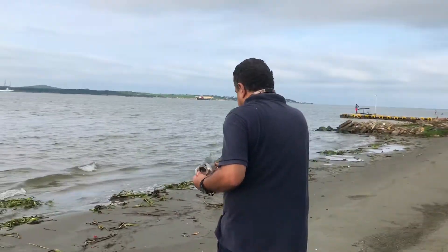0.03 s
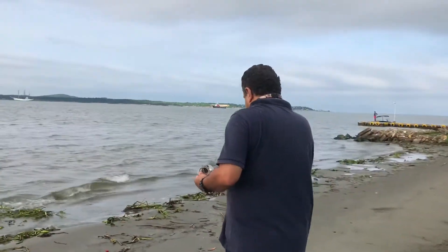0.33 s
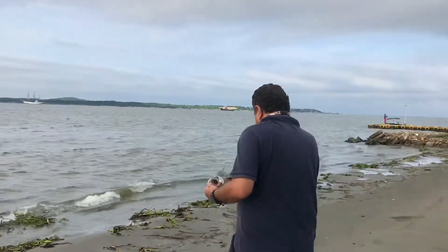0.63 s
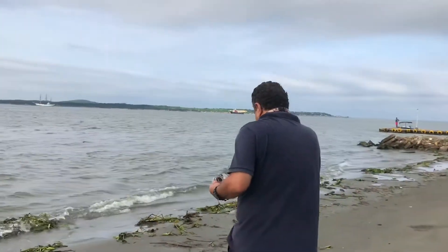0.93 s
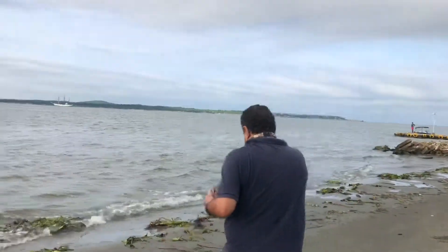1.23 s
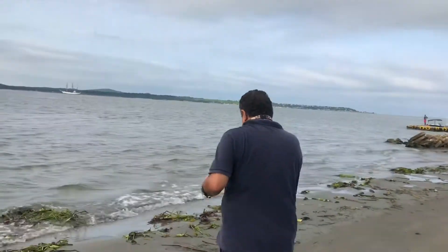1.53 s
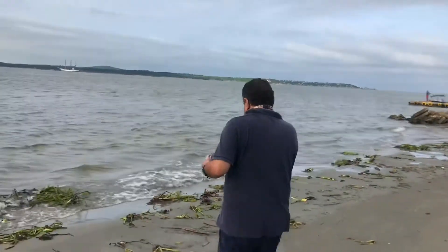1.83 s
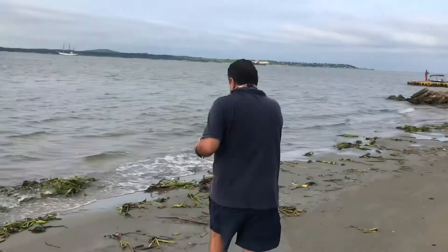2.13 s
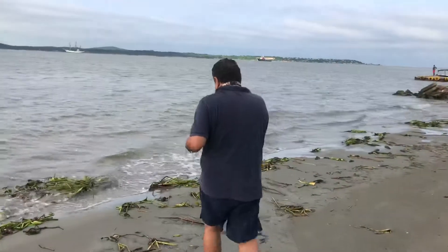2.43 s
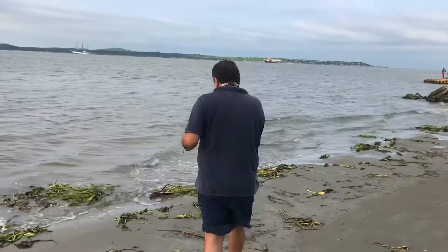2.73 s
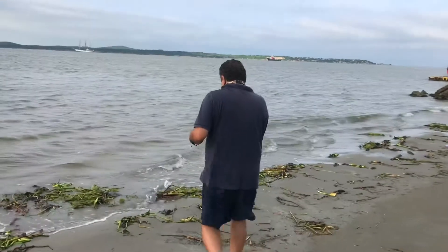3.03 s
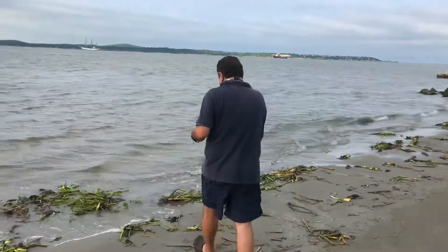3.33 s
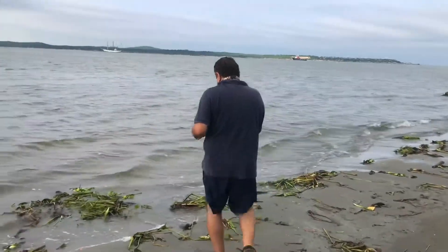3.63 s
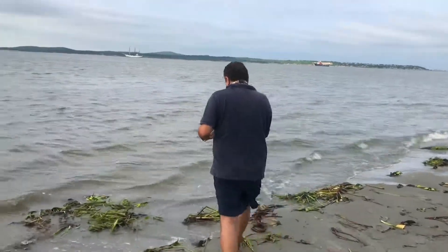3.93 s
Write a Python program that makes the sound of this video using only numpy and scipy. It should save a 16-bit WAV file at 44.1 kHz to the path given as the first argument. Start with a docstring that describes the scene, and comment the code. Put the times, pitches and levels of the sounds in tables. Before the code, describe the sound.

Footsteps crunch on wet sand near the microphone, about one every 0.6 seconds, from the start until roughly 3.7 seconds. Wind rumbles throughout, with gusts buffeting the microphone in the first half second, from about 1.4 to 1.8 seconds and again near 3 seconds. Small waves hiss and bubble behind, swelling slightly around 1 second, and a few droplets tick close by.

```python
"""At the water's edge, on wet sand: a person walks near the microphone, a step about every 0.6 s.
Each step packs the sand in a run of tiny slips: a hollow scrunch at the heel, then a brighter
crunch that stops short. Wind rumbles on the microphone and its gusts briefly overload it.
Behind the steps, small waves fizz on the shore with bursting bubbles, and droplets tick close by."""
import sys
import numpy as np
from scipy import signal
from scipy.fft import rfft, irfft
from scipy.io import wavfile
from scipy.ndimage import uniform_filter1d

SR = 44100
rng = np.random.default_rng(int(sys.argv[2]) if len(sys.argv) > 2 else 0)


def log_audio(samples):
    """Write samples as a 16-bit WAV file to the path given in sys.argv[1]."""
    # one column per channel
    frames = np.atleast_2d(samples).T
    # limit to full scale, then quantise
    limited = np.clip(frames, -1, 1)
    pcm = np.round(limited * 32767).astype(np.int16)
    wavfile.write(sys.argv[1], SR, pcm)


N = 176400
TIME = np.arange(N) / SR
FILTER_HZ = np.fft.rfftfreq(4096, 1 / SR)


def amp(db):
    return 10 ** (np.asarray(db) / 20)


def unit_rms(x):
    return x / np.sqrt(np.mean(x ** 2) + 1e-20)


def spectrum_db(points, hz=FILTER_HZ):
    """Join spectrum points with straight lines on a log-frequency axis."""
    point_hz, db = np.transpose(points)
    return np.interp(np.log(hz + 1), np.log(point_hz), db)


def add(mix, start, sound):
    part = mix[max(round(start * SR), 0):][:len(sound)]
    part += sound[:len(part)]


def colour(x, db):
    """Minimum-phase filter with the given gains at FILTER_HZ."""
    log_gain = np.log(amp(np.r_[db, db[-2:0:-1]]))
    taps = np.fft.ifft(np.exp(signal.hilbert(log_gain).conj())).real
    return signal.fftconvolve(x, taps[:len(db)])


def noise(gain):
    """Noise of rms 1 whose spectrum is gain(Hz)."""
    hz = np.fft.rfftfreq(N, 1 / SR) + 1
    return unit_rms(irfft(rfft(rng.standard_normal(N)) * gain(hz), N))


def steadied(x, share, samples):
    """Even out a share of the chance swells."""
    power = uniform_filter1d(x ** 2, size=samples) + 1e-9
    return unit_rms(x / power ** (share / 2))


def slip(samples=200, grit=0.28, decay_s=0.0012):
    """One slip of the sand: a click and a brief spill of grains."""
    burst = grit * rng.standard_normal(samples) * np.exp(-np.arange(samples) / SR / decay_s)
    burst[0] += 1
    return burst


# Wet sand under the heel and under the sole (frequency [Hz], level [dB])
HEEL_SPECTRUM = [(100, -23), (350, -14), (700, -10), (1100, -1.5), (1600, -1.5), (2300, -8.5), (3200, -17),
                 (4100, -15.5), (5000, -21), (8000, -30), (10300, -56), (16000, -54)]
SOLE_SPECTRUM = [(100, -22), (350, -5.5), (700, -7), (1200, -7), (1700, -7.5), (2300, -7), (3200, -4.5),
                 (4150, 4), (4950, -14.5), (8000, -19), (10300, -28), (16000, -43)]

def sand_colour(tone):
    """Tone 0 is the hollow heel, 1 the bright sole; above 1 is brighter still."""
    return (1 - tone) * spectrum_db(HEEL_SPECTRUM) + tone * spectrum_db(SOLE_SPECTRUM)


# Sand giving way underfoot, near the microphone (time [s], length [s], level [dB], tone [0 heel, 1 sole])
SCRUNCHES = [(0.0, 0.025, -22.5, 0.34), (0.549, 0.034, -36, 0.09), (.582, 0.072, -24.5, 0.47),
             (1.166, 0.092, -31, 0.72), (1.253, 0.029, -26, 0.63), (1.283, 0.039, -23.5, 0.9),
             (1.826, .065, -20.5, 0.59), (2.342, 0.074, -28, 0.79), (2.419, 0.065, -22.5, 0.8),
             (2.911, 0.085, -32, 0.63), (2.966, 0.0252, -23.5, 0.064), (2.989, 0.017, -26, 0.72),
             (3.006, 0.053, -27.5, 0.63), (3.53, 0.064, -30.5, 0.89)]

def scrunches(slips_per_s=250, jitter=0.38, build_db=6, attack_s=0.002, stop_s=0.0036):
    """Sand sticks and slips at an uneven rate, harder as the weight comes on, then stops short."""
    out = np.zeros(N)
    for start, length, db, tone in SCRUNCHES:
        t = TIME[TIME < length]
        slips = np.zeros(len(t))
        gaps = np.exp(jitter * rng.standard_normal(40)) / slips_per_s
        for onset in np.cumsum(gaps) - gaps[0]:
            add(slips, onset, amp(0.5 * rng.standard_normal()) * slip())
        rub = 0.62 * rng.standard_normal(SR)[:len(t)]
        weight = amp(build_db * t / length)
        gate = np.minimum(t / attack_s, 1) * np.minimum((length - t) / stop_s, 1)
        crunch = colour((unit_rms(slips) + rub) * weight * gate, sand_colour(tone))
        add(out, start, amp(db) * crunch * np.sqrt(len(t) / np.sum(crunch ** 2)))
    return out


# Sharp slips that stand out of the steps (time [s], peak level [dB], tone [0 heel, 1 sole])
SAND_SNAPS = [(0.558, -12.5, 0), (.5663, -5.5, 0.3), (0.628, -5, 0.34), (0.637, -7, 0.8), (0.645, -26, 0.4),
              (1.2857, -2.5, 1.1), (1.2908, -1, .7), (1.295, -5.5, 0.7), (1.301, -3.5, 0.6),
              (1.325, -10, 1.1), (1.3453, -13, 0.4), (1.871, -23, .9), (1.8774, -24, 1), (2.391, -7.5, .8),
              (2.403, -23, 0.9), (2.468, -7.5, 1), (2.4723, -15, 1.0), (2.9785, -32, 0.5), (3.0447, -8, 1),
              (3.5393, -13, 1), (3.5924, -20.5, 1.7), (3.598, -13, 1.7), (3.673, -18.5, 1.5),
              (3.6849, -18, 1.4)]

def sand_snaps(top_hz=5200, dull_db=7):
    """Big single slips move more sand and lack the finest hiss."""
    out = np.zeros(N)
    treble_cut_db = dull_db * (1 - 1 / (1 + (FILTER_HZ / top_hz) ** 8))
    for start, db, tone in SAND_SNAPS:
        snap = colour(slip(), sand_colour(tone) - treble_cut_db)
        add(out, start, amp(db) * snap / abs(snap).max())
    return out


# How the microphone answers moving air (frequency [Hz], level [dB])
AIR_SPECTRUM = [(15, -50), (45, -17), (80, -4), (125, 4.5), (180, -2), (250, -6), (340, -5.5), (500, -4.5),
                (700, -10), (1050, -5.5), (1400, -16.5), (2000, -27), (4000, -60)]
# Gusts right on the microphone (time [s], length [s], level [dB], upper edge [Hz])
GUSTS = [(0.019, 0.091, -12.5, 425), (.118, 0.067, -10.5, 470), (0.181, 0.07, -13.5, 304),
         (0.277, 0.056, -14, 352), (0.327, 0.111, -10.5, 364), (0.442, 0.12, -16, 400),
         (0.681, 0.099, -14.5, 175), (0.814, 0.062, -18, 454), (0.916, 0.024, -22, 347),
         (1.19, 0.083, -27, 280), (1.32, 0.04, -15.5, 450), (1.431, 0.19, -14.5, 560),
         (1.607, 0.067, -12.5, 670), (1.661, 0.16, -10, 734), (2.065, 0.04, -15.5, 556),
         (2.106, 0.057, -14.5, 537), (2.151, .055, -23.5, 535), (2.712, 0.114, -29.5, 199),
         (2.87, 0.078, -24, 334), (2.965, 0.025, -16.5, 487), (3.037, 0.01, -12, 720),
         (3.125, 0.019, -19, 416), (3.166, 0.04, -18.5, 394), (3.25, 0.037, -21, 264),
         (3.393, 0.079, -28.5, 328), (3.454, 0.054, -16.5, 390)]

def gusts(rise_s=0.0052, fall_s=0.021, flutter_db=3, flutter_hz=70.6, slope=3.16):
    """Fluttering turbulence; faster air reaches higher in pitch."""
    out = np.zeros(N)
    flutter = amp(flutter_db * noise(lambda f: 1 / (1 + (f / flutter_hz) ** 2)))
    for start, length, db, edge_hz in GUSTS:
        air = noise(lambda f: amp(spectrum_db(AIR_SPECTRUM, f)) / np.hypot(1, (f / edge_hz) ** slope))
        rise = np.clip((TIME - start) / rise_s, 0, 1)
        fall = np.clip((start + length - TIME) / fall_s + 0.5, 0, 1)
        puff = steadied(air, share=0.48, samples=400) * flutter * rise * fall
        out += amp(db) * puff * np.sqrt(length * SR / (np.sum(puff ** 2) + 1e-9))
    return out


# Single eddies knocking on the microphone (time [s], peak level [dB], pitch [Hz])
BUFFETS = [(0.075, -8.5, 580), (.121, -13.5, 483), (.151, -6.5, 607), (0.225, -10, 600), (0.28, -15, 435),
           (.305, -14, 480), (0.33, -5.5, 474), (.362, -8, 720), (.404, -4, 400), (.853, -16, 517),
           (1.441, -7.5, 494), (1.479, -7.5, 516), (1.518, -25, 596), (1.657, -3, 604), (1.706, -6, 636),
           (1.785, -3.5, 740), (2.913, -10, 390), (2.936, -11, 390), (3.04, 0.5, 500), (3.485, -12.5, 514)]

def buffets(rise_cycles=0.42):
    """Each eddy gives the microphone a short push and pull."""
    out, t = np.zeros(N), TIME[TIME < 0.03]
    for start, db, hz in BUFFETS:
        age = t * hz / rise_cycles
        knock = age * np.exp(1 - age) * np.sin(2 * np.pi * hz * t)
        add(out, start, rng.choice([-1, 1]) * amp(db) * knock)
    return out


# Low wind rumble on the microphone (frequency [Hz], level [dB])
RUMBLE_SPECTRUM = [(12, -48), (25, -21), (40, -7.5), (52, -4), (66, 3.5), (90, -6), (125, -4.5),
                   (170, -12.5), (250, -32), (400, -48.5), (1000, -66), (4000, -100)]
# Its swells and lulls (time [s], level [dB])
RUMBLE_LEVELS = [(0, -8), (.14, -8.5), (.27, -14.5), (.34, -5.5), (.5, -9.5), (.67, -16), (.73, -8.5),
                 (.8, -22), (.95, -15), (1.1, -18), (1.36, -13), (1.52, -13.5), (1.82, -19), (1.88, -23),
                 (2.04, -22), (2.1, -15), (2.35, -23.5), (2.47, -27), (2.61, -27.5), (2.8, -16),
                 (3.05, -16.5), (3.22, -18.5), (3.28, -11.5), (3.35, -29), (3.4, -19.5), (3.53, -11.5),
                 (3.65, -28), (3.85, -18), (4.0, -24.5)]

def wind_rumble():
    """Slow eddies push on the microphone all the time."""
    eddies = noise(lambda f: amp(spectrum_db(RUMBLE_SPECTRUM, f)))
    level = amp(np.interp(TIME, *np.transpose(RUMBLE_LEVELS)))
    return steadied(eddies, share=0.33, samples=2600) * level


def bubbles(per_s=830, pitches=36, spread_db=6.5, decay_cycles=3.4):
    """Bubbles burst at random in the wash, each ringing for a few cycles."""
    out, t = np.zeros(N), TIME[TIME < 0.02]
    for hz in np.geomspace(900, 13000, pitches):
        pops = rng.random(N) < per_s / pitches / SR
        strength = amp(spread_db * np.minimum(rng.exponential(1, N), 4))
        ring = hz * np.sin(2 * np.pi * hz * t) * np.exp(-t * hz / decay_cycles)
        out += signal.oaconvolve(pops * strength, ring)[:N]
    return unit_rms(out)


# Water washing over the shore (frequency [Hz], level [dB])
WASH_SPECTRUM = [(100, 2), (300, 5), (420, 1), (560, 5.5), (720, 2), (1000, 5), (1400, 0.5), (2000, 0.5),
                 (2700, -3), (3250, -2.5), (3750, 1), (4200, 1), (4900, -8.5), (5400, -8.5), (6500, -10),
                 (8300, -8.5), (9300, -13), (10300, -20), (11500, -17.5), (13000, -20.5), (16000, -21)]
# Small waves behind the steps (time [s], level [dB], treble fizz gain [dB])
WAVES = [(0, -34.5, 1), (.28, -36, 2.5), (.5, -33, 1.5), (.7, -31.5, -0.5), (.95, -32, 3), (1.23, -30.5, 1),
         (1.42, -32.5, 1), (1.75, -34, 1.5), (1.95, -36, 2.5), (2.3, -37.5, 4), (2.65, -36, 1),
         (2.9, -37, 3), (3.2, -37, 2.5), (3.45, -34.5, 2), (3.7, -34.5, 2), (4.0, -32, -1.5)]

def waves(patch_db=1.27, bubbles_db=-12.5, fizz_hz=4480):
    """The wash is patchy hiss and bursting bubbles; its treble swells and fades."""
    spectrogram = signal.stft(rng.standard_normal(N), nperseg=512)[2]
    patches = uniform_filter1d(rng.standard_normal(spectrogram.shape), size=6, axis=0)
    patches = unit_rms(uniform_filter1d(patches, size=9, axis=1))
    hiss = unit_rms(signal.istft(spectrogram * amp(patch_db * patches))[1][:N])
    water = hiss + amp(bubbles_db) * bubbles()
    wash = unit_rms(colour(water, spectrum_db(WASH_SPECTRUM))[:N])
    fizz = signal.sosfiltfilt(signal.butter(2, fizz_hz, "high", fs=SR, output="sos"), wash)
    times, db, fizz_db = np.transpose(WAVES)
    fizz_gain = amp(np.interp(TIME, times, fizz_db))
    return amp(np.interp(TIME, times, db)) * (wash - fizz + fizz * fizz_gain)


# Foam of one small wave breaking on the shore (frequency [Hz], level [dB])
FOAM_SPECTRUM = [(500, -22), (2000, -12), (4200, 3.5), (5000, 0), (6500, 1), (8300, -2.5), (10300, -15.5),
                 (11800, -3), (13500, -7), (16000, -13)]

def foam(start_s=0.43, length_s=1.2, crest_db=-44.5):
    """Countless tiny bubbles burst into a hiss as a wave folds over and runs out."""
    swell = np.sin(np.pi * np.clip((TIME - start_s) / length_s, 0, 1))
    hiss = noise(lambda f: amp(spectrum_db(FOAM_SPECTRUM, f)))
    return amp(crest_db) * np.sqrt(abs(swell)) * hiss


# The tick of a drop (frequency [Hz], level [dB])
DROP_SPECTRUM = [(500, -40), (2000, -27), (4200, 0), (5500, 9), (8300, 16), (10300, -9), (12500, 9),
                 (16000, -16)]
# Droplets close to the microphone (time [s], peak level [dB])
DROPLETS = [(.159, -23), (.883, -23), (2.072, -32), (2.091, -21), (2.347, -35), (3.153, -30), (3.401, -32),
            (3.463, -28), (3.729, -51), (3.97, -20)]

def droplets():
    """Each near drop lands with one bright tick."""
    out = np.zeros(N)
    for start, db in DROPLETS:
        tick = colour(slip(), spectrum_db(DROP_SPECTRUM))
        add(out, start, amp(db) * tick / abs(tick).max())
    return out


def spray(drops_per_s=300, spread_db=7, below_waves_db=23.5):
    """Farther off, a fine crackle of drops follows the level and fizz of the waves."""
    ticks = rng.standard_normal(N) * (rng.random(N) < drops_per_s / SR)
    ticks *= amp(spread_db * np.minimum(rng.exponential(1, N), 2))
    crackle = unit_rms(colour(ticks, spectrum_db(DROP_SPECTRUM))[:N])
    times, db, fizz_db = np.transpose(WAVES)
    return crackle * amp(np.interp(TIME, times, db + fizz_db) - below_waves_db)


def scene():
    """Shore, wind and footsteps meet at one microphone."""
    shore = waves() + foam() + spray() + droplets()
    wind = wind_rumble() + gusts() + buffets()
    footsteps = scrunches() + sand_snaps()
    return (footsteps + wind + shore)[None]


def record(dry):
    """The microphone drops the deepest bass, rounds off the strongest gusts and loses the top treble."""
    low_cut_hz, high_cut_hz = 22, 15950
    knee, headroom = 0.8, 0.2  # shares of full scale
    heard = signal.sosfilt(signal.butter(2, low_cut_hz, "high", fs=SR, output="sos"), dry)
    clean = np.clip(heard, -knee, knee)
    rounded = clean + headroom * np.tanh((heard - clean) / headroom)
    lowpass = signal.firwin(1023, high_cut_hz, window=("kaiser", 9), fs=SR)
    return signal.oaconvolve(rounded, lowpass[None], "same")


dry = scene()
out = record(dry)
log_audio(out)
```